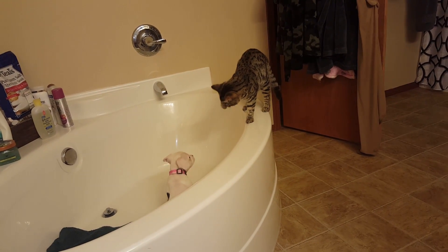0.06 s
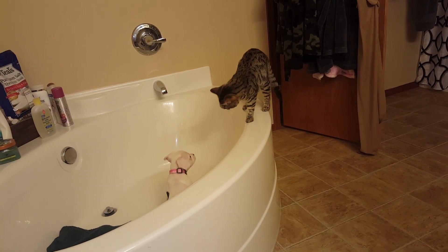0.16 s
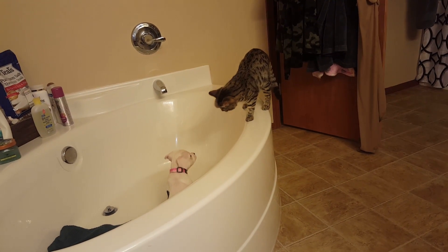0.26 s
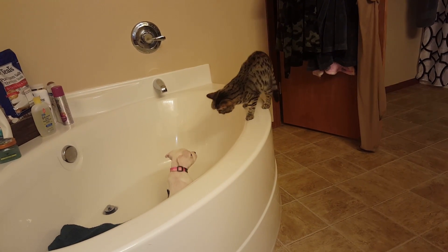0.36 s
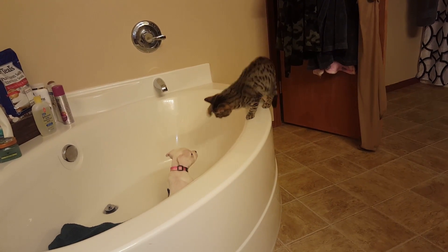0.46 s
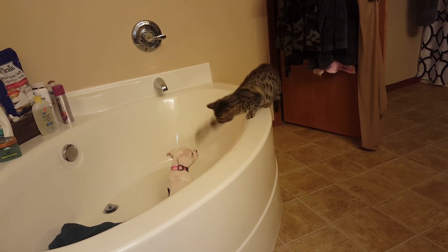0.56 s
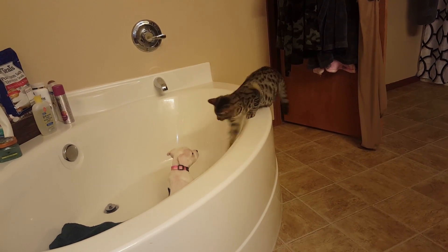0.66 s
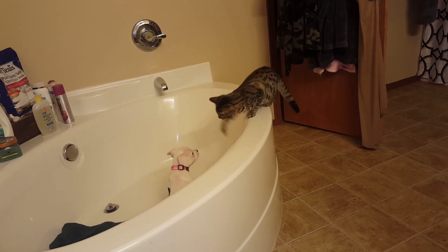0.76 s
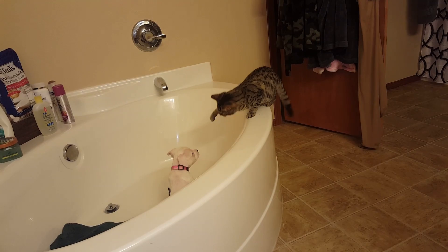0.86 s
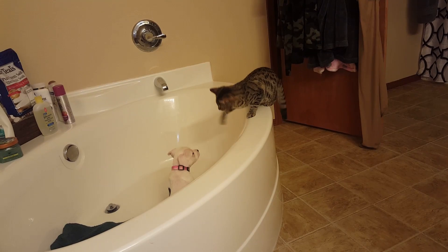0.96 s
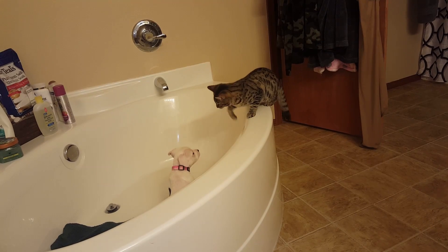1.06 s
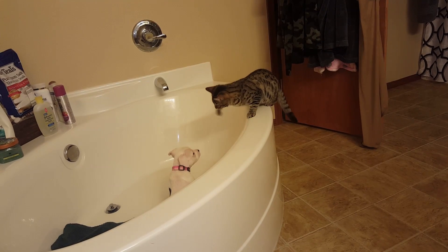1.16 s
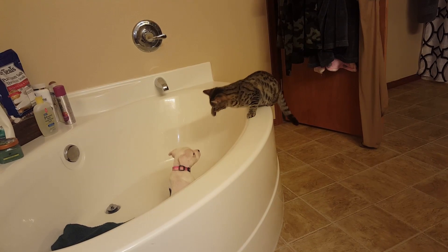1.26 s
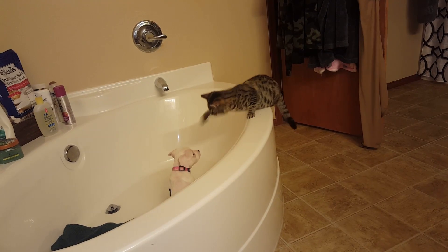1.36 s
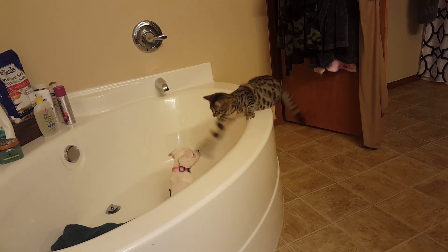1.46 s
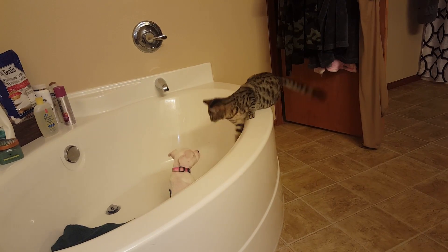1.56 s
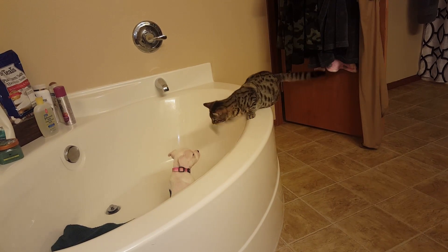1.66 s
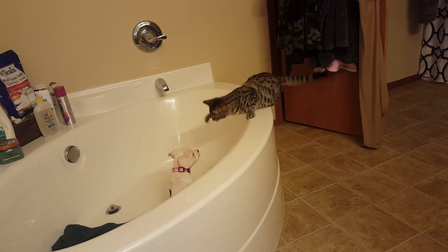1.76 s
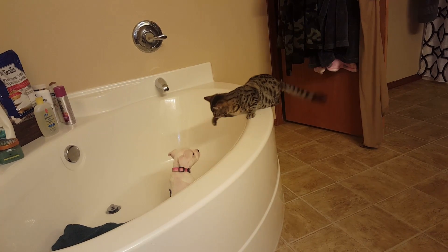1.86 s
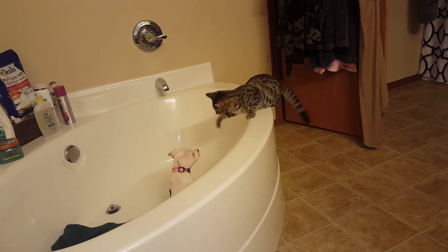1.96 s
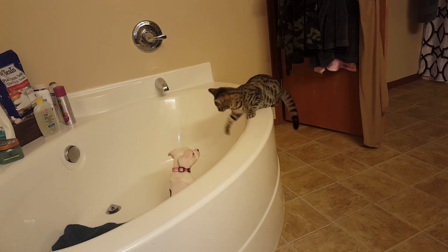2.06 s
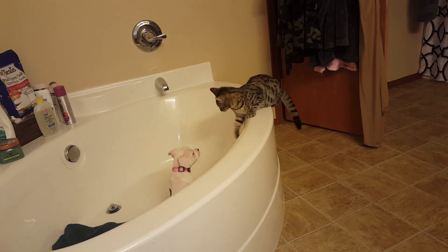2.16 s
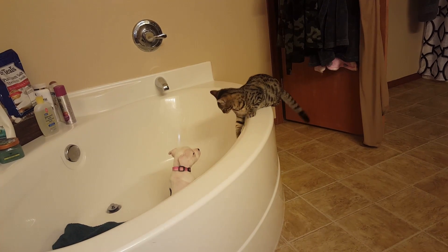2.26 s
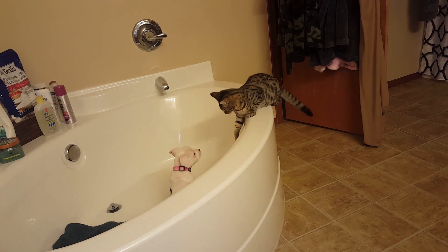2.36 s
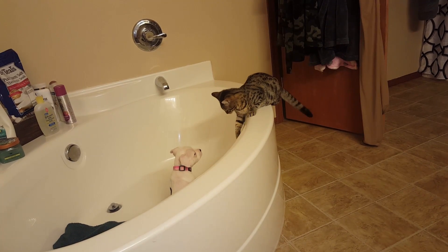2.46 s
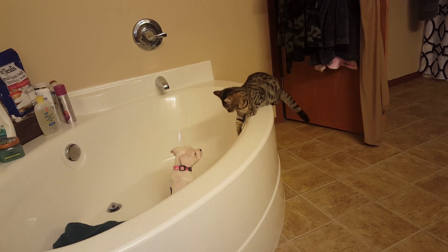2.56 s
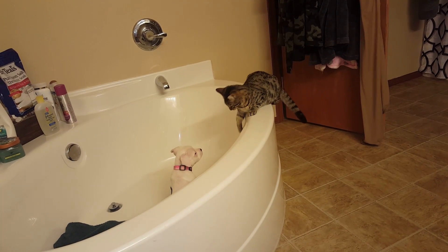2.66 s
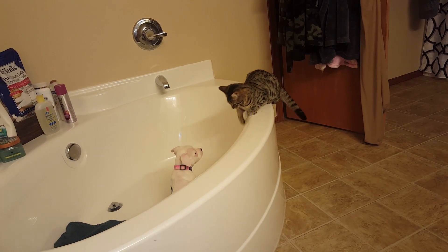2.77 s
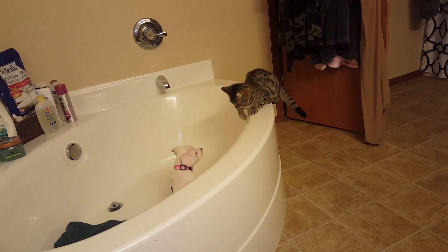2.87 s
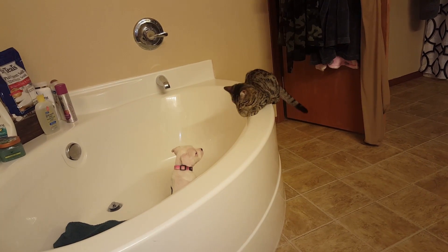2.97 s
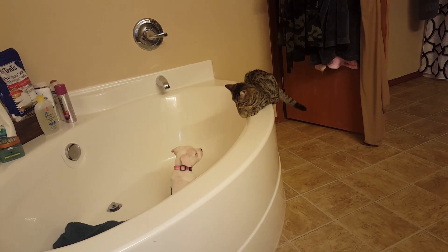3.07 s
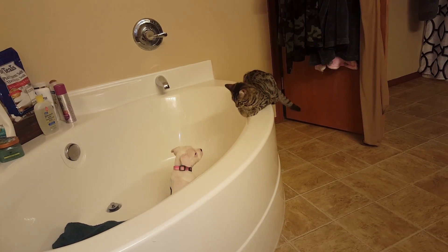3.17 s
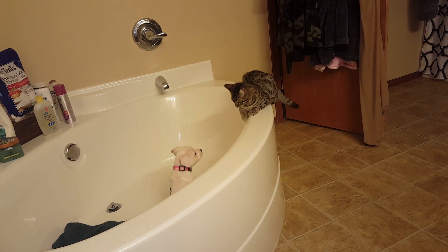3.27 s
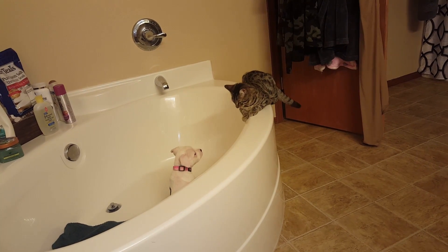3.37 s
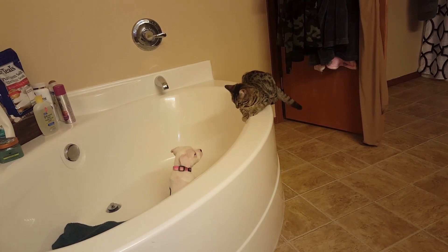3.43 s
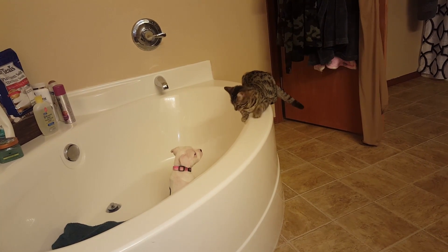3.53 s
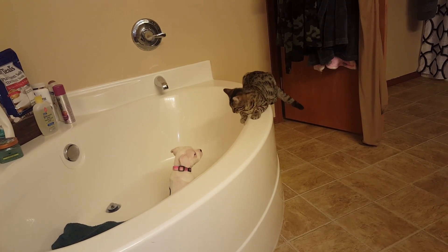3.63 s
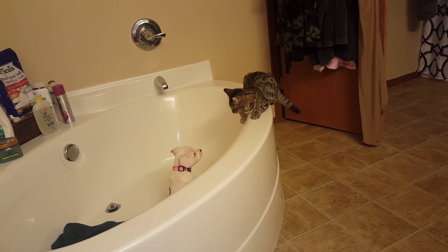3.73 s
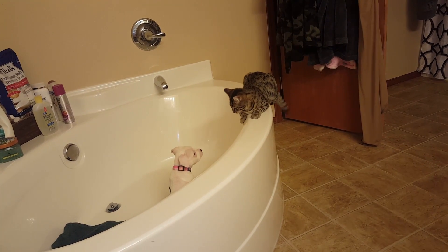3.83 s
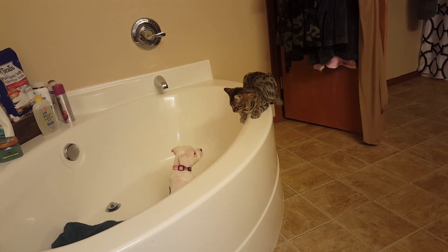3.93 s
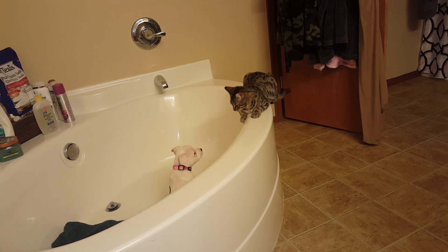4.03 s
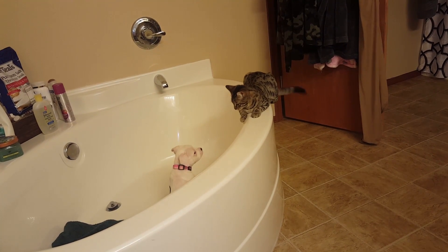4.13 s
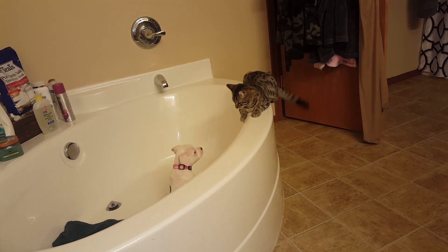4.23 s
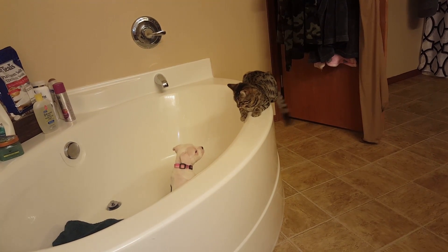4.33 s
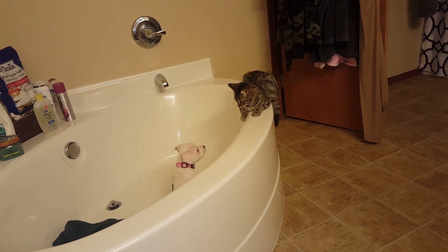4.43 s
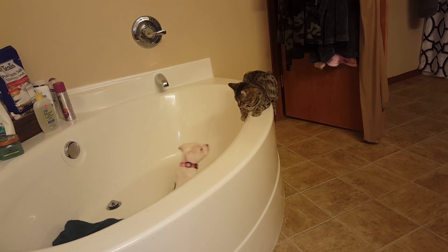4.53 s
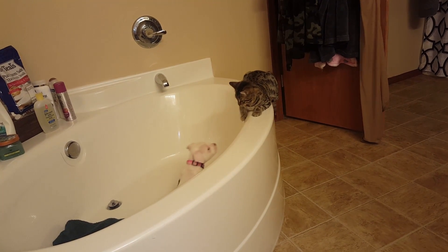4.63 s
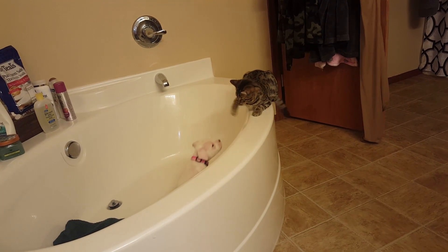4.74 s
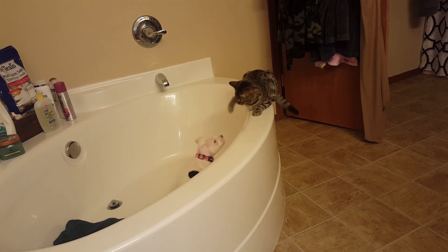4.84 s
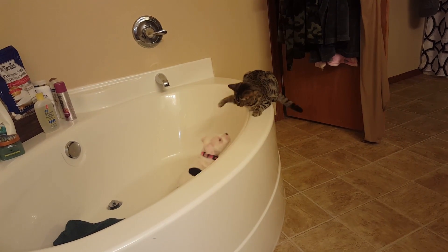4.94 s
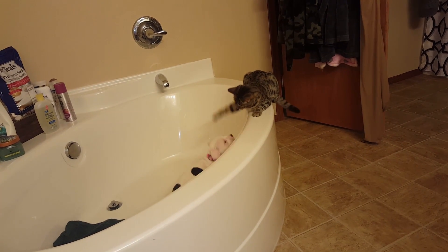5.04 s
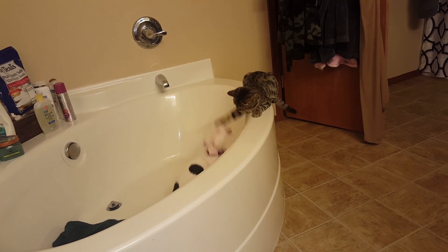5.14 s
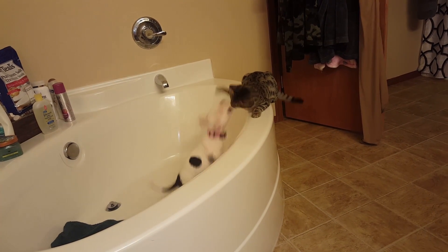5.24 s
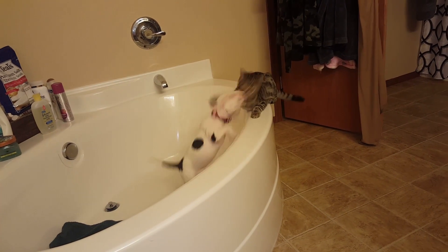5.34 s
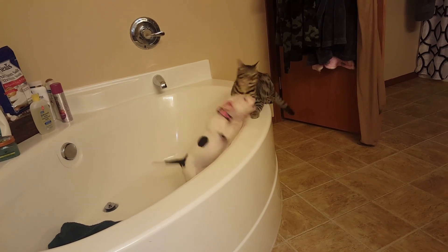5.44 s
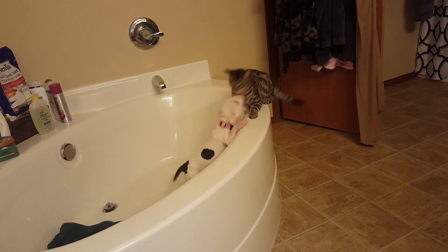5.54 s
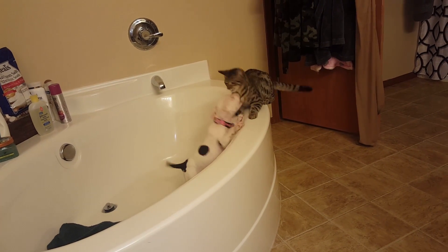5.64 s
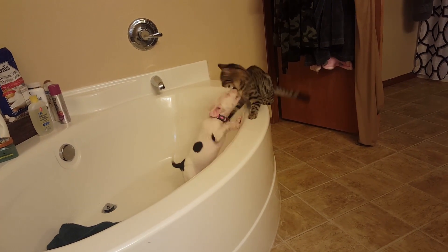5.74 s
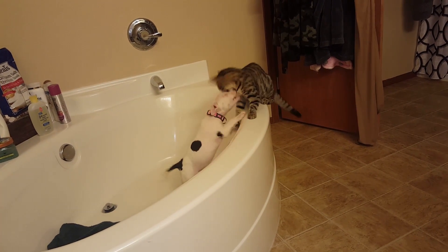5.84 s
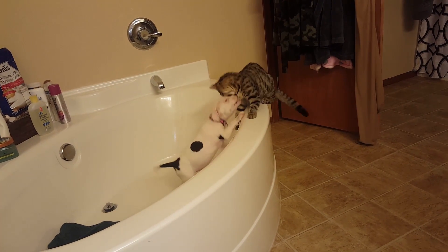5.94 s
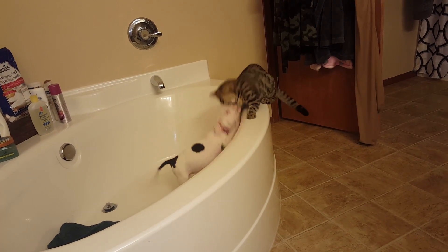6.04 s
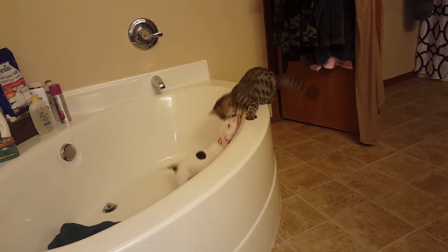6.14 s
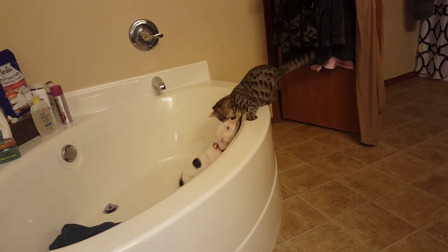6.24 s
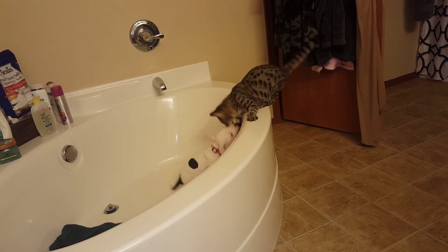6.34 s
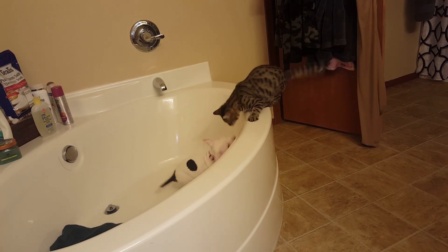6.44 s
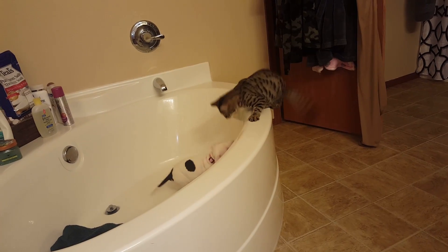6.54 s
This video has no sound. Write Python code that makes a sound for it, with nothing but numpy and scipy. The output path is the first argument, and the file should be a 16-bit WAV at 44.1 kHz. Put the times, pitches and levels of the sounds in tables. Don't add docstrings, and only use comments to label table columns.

```python
import sys
import numpy as np
from scipy import signal
from scipy.fft import rfft, irfft, next_fast_len
from scipy.io import wavfile
from scipy.ndimage import uniform_filter1d

SR = 44100
rng = np.random.default_rng(int(sys.argv[2]) if len(sys.argv) > 2 else 0)


def field_ratio(decibels):
    return 10 ** (np.asarray(decibels, dtype=float) / 20)


def unload_wav(signal):
    wavfile.write(
        sys.argv[1],
        SR,
        np.round(np.clip(np.atleast_2d(signal).T, -1, 1) * 32767).astype(np.int16),
    )


N = 290999


# pitch in Hz, level in dB.
EDGE_COLOUR = [(820, -15), (1400, -6), (1850, -5), (2110, -2.5), (2800, -2.5), (3280, -6), (4760, -7),
               (6000, -14.5), (7800, -30.5), (13200, -120)]
# pitch in Hz, level in dB.
CLAW_COLOUR = [(2940, -15), (5000, -11), (5150, -16), (7170, 1), (7860, 3.5), (8880, 4), (9280, -1),
               (10300, -11), (10900, -30), (11500, -11), (13000, -10), (14200, -10), (16000, -38)]
# start in seconds, edge level in dB, claw level in dB.
HARD_TOUCHES = [(1.616, -63.5, -61), (5.5436, -11, -25.5), (2.7046, -71, -65), (3.255, -55, -61.5),
                (3.624, -67, -75), (3.694, -78, -89), (3.7296, -68, -83), (4.232, -52, -63.5),
                (4.3904, -68, -73), (4.7542, -65, -84), (4.8345, -65.5, -71), (5.079, -64, -50.5),
                (5.0883, -53, -74), (5.421, -46, -43), (5.5214, -46, -56), (5.5463, -11, -18),
                (5.7002, -38, -57), (5.901, -54, -46), (5.987, -47.5, -53), (6.106, -47, -47),
                (6.1432, -45, -44), (6.449, -50, -74), (6.468, -52, -64), (6.5806, -52, -55)]
# start in seconds, weight into the shell in dB, pad level in dB, pad pitch in Hz.
LANDINGS = [(0.5794, -72, -65.5, 633), (1.618, -40.5, -58, 564), (2.064, -41, -37, 520),
            (3.2535, -35, -43, 590), (3.624, -72, -54, 684), (4.2328, -78, -57.5, 1170),
            (4.3906, -82, -59, 1650), (4.8342, -49.5, -64, 468), (5.0803, -39, -59, 530),
            (5.0888, -48, -41, 386), (5.42, -45, -39, 1200), (5.459, -25, -58, 413),
            (5.527, -51, -28.5, 437), (5.551, -25.5, -18.5, 790), (5.7006, -40.5, -40, 443),
            (5.902, -40, -49, 576), (5.9725, -36.5, -44, 460), (5.9852, -64, -38, 1050),
            (6.0241, -68, -53, 1550), (6.106, -32, -40.5, 880), (6.1432, -51, -36.5, 490),
            (6.28, -40, -40.5, 500), (6.4486, -63, -48, 950), (6.5817, -36.5, -51.5, 543)]
# start in seconds, level in dB, direct share in dB.
CATCHES = [(3.623, -58.5, -5), (3.694, -49, -32), (3.733, -53.5, -30), (4.236, -50, -21),
           (4.754, -57.5, -24), (5.089, -39.5, -15), (5.523, -30, -10.5), (5.986, -31, -7),
           (2.068, -45, -28), (5.583, -25.5, -17), (5.084, -46, -17), (5.566, -27.5, -28),
           (5.974, -43.5, -7), (6.024, -40, -14), (6.107, -45, -14), (6.47, -45.5, -14), (2.064, -52, -2),
           (2.072, -44, -2), (2.097, -46, -2), (5.15, -58, -10), (5.182, -58, -15), (6.226, -48, -10),
           (6.275, -46, -10)]
# pitch in Hz, level in dB, 60 dB fade in
# seconds.
CAUGHT_PARTS = [
    [(710, -7, 0.018), (2470, 15, 0.0089)],
    [(1630, -2, 0.017), (2150, 2, 0.011), (2900, -9, 0.05), (3580, -6, 0.018)],
    [(1310, -17, 0.022), (1920, 5, 0.0069), (2970, -9, 0.0082), (3950, -8, 0.019)],
    [(1170, -16, 0.021), (1360, 8, 0.021), (2330, 6, 0.017), (3400, -15, 0.015), (4080, 5, 0.014),
     (4530, 2, 0.031)],
    [(1630, 2, 0.0081), (2600, -11, .01)],
    [(211.3, 18, 0.3), (325, -18, 0.057), (557, -19, 0.091), (700, -19, .04)],
    [(2460, 10, 0.0068), (6700, -8, 0.008)],
    [(1050, -1, 0.1), (1280, 2.5, 0.01), (1460, -8, 0.018)],
    [(1970, 1, 0.0019), (2520, 3, 0.0046), (3420, -13, .006)],
    [(328, -11, 0.055), (463, -7, 0.08), (665, -8, 0.014), (970, -6, 0.03)],
    [(9300, 0, 0.0022), (12200, -7, .002)],
    [(1010, 0, 0.024)],
    [(490, 0, 0.02)],
    [(1550, 0, 0.028)],
    [(2600, 0, 0.013), (3430, 0, 0.0092)],
    [(2370, 3, 0.0056), (3000, -10, 0.0091)],
    [(420, 0, .03), (900, -6, .02)],
    [(420, 0, .12), (770, -6, .1), (1390, -7, .1)],
    [(500, 0, .08), (880, -2, .08)],
    [(4600, 0, .2)],
    [(6500, 0, .01), (12500, -4, .006)],
    [(700, 0, .02), (2900, -8, .01)],
    [(500, 0, .03), (1000, -3, .02)],
]


def contacts(send_db=24, weight_send_db=22, rebound=0.2, settle_ms=30, pad_octaves=0.84):
    places, near = np.zeros((4, N)), np.zeros(N)
    edge, claw, body = colour(EDGE_COLOUR, steep_db=26), colour(CLAW_COLOUR), shell()
    clicks = [(s, field_ratio(edge_db) * edge + field_ratio(claw_db) * claw) for s, edge_db, claw_db in HARD_TOUCHES]
    for k, (s, weight_db, pad_db, pad_hz) in enumerate(LANDINGS):
        low_hz, high_hz = pad_hz / 2 ** pad_octaves, pad_hz * 2 ** pad_octaves
        pad = colour([(low_hz, -5), (pad_hz, 0), (high_hz, -7)], steep_db=25)
        clicks.append((s, field_ratio(pad_db) * pad))
        add(places[k % 4], s, field_ratio(weight_send_db + weight_db) * body)

    delays = rng.uniform(0.14, 1, (len(clicks), 2)) * settle_ms / 1000
    for k, (s, click) in enumerate(clicks):
        sent = field_ratio(send_db) * click
        add(places[k % 4], s, sent)
        add(places[(k + 1) % 4], s + delays[k, 0], rebound * sent)
        add(places[(k + 2) % 4], s + delays[k, 1], rebound * sent)

    for k, ((s, db, near_db), modes) in enumerate(zip(CATCHES, CAUGHT_PARTS)):
        ring = catch(modes)
        add(places[k % 4], s, field_ratio(send_db - 2 + db) * ring)
        add(near, s, field_ratio(send_db + near_db + db) * ring)
    heard = near + sum(room(place) for place in places)
    return signal.lfilter(*signal.butter(2, 50, "high", fs=SR), heard)


def catch(modes):
    hz, db, t60 = np.transpose(modes)[:, :, None]
    t = np.arange(9000) / SR
    ring = field_ratio(db - 60 * t / t60) / np.sqrt(t60) * np.sin(2 * np.pi * hz * t)
    ring = ring.sum(axis=0) * (1 - np.exp(-t / 0.0004))
    return ring / np.linalg.norm(ring)


# pitch in Hz, width in Hz, level in dB.
SHELL_MODES = [(42, 18, -16), (63, 18, -7), (91, 18, 2), (125, 24, -10), (160, 18, 2), (225, 22, 3),
               (280, 30, -5), (345, 30, -14), (465, 24, -5)]


def shell():
    t = np.arange(8000) / SR
    ring = np.zeros(len(t))
    for hz, width, db in SHELL_MODES:
        ring += field_ratio(db) * width * np.exp(-np.pi * width * t) * np.sin(2 * np.pi * hz * t)
    ring = signal.lfilter(*signal.butter(2, 38, "high", fs=SR), ring)
    return ring / np.linalg.norm(ring)


# start in seconds, level in dB, pitch in Hz, 60 dB fade in seconds.
BOOMS = [(3.631, -59, 38, .4), (5.458, -38, 89.6, 0.41), (5.457, -26, 220, 0.071), (5.45, -38, 40, .5),
         (5.53, -39, 40, .5), (5.534, -24, 63, 0.16), (5.543, -26.5, 90.6, 0.39), (5.565, -28.5, 464, 0.37),
         (5.684, -33.5, 162.3, 0.33), (5.904, -46, 221, 0.11), (5.9, -43, 40, 0.27), (5.9, -59, 65, 0.25),
         (6.07, -39, 94.6, 0.47), (6.106, -30.5, 157, 0.097), (5.549, -33.5, 220, 0.35),
         (6.168, -29, 233, 0.33), (6.305, -38, 132, 0.17), (5.09, -38, 251, 0.19), (6.15, -52, 40, .3),
         (6.235, -62, 63, .35), (6.255, -35.5, 89.5, 0.75), (6.362, -33, 208.4, 0.25),
         (6.275, -33, 118, .2), (6.31, -36, 95, .2), (6.43, -33.5, 162.3, 0.19)]


def booms(rise_ms=9.8):
    out, t = np.zeros(N), np.arange(SR // 2) / SR
    for s, db, hz, t60 in BOOMS:
        swell = 1 - np.exp(-t * 1000 / rise_ms)
        add(out, s, field_ratio(db - 60 * t / t60) * swell * np.sin(2 * np.pi * hz * t))
    return out


# pitch in Hz, level in dB.
FUR_COLOUR = [(1470, -12.5), (2500, -9), (3130, -9.5), (3600, -9.5), (4620, -9), (5800, -9), (8460, -6.5),
              (10400, -16), (13000, -10.5), (15000, -21), (16000, -11)]
# pitch in Hz, level in dB.
DRAG_COLOUR = [(210, -34), (330, -2.5), (420, -11.5), (661, -10.5), (1080, -13), (1270, -16.5),
               (3500, -35.5), (4550, -76), (7700, -120)]
# start in seconds, rise in seconds, fade in seconds, hiss in dB, sheen in dB over the hiss.
BRUSHES = [(.96, 0.067, 0.23, -59, -3), (1.07, 0.075, 0.13, -57.5, -14), (2.70, 0.023, 0.11, -52, -3),
           (4.28, .03, .14, -67, -3), (4.6, 0.06, 0.091, -58.5, -14), (4.86, 0.03, 0.054, -69, 3.5),
           (5.066, 0.01, 0.13, -47.5, -9), (5.13, 0.047, 0.041, -40, -5), (5.26, 0.1, 0.08, -54, -4),
           (5.41, 0.0064, 0.082, -37.5, -1), (5.77, 0.051, 0.22, -47.5, -0.5),
           (5.88, 0.057, 0.045, -44, -5), (6.07, 0.028, 0.28, -50, 3.5), (6.22, 0.14, 0.17, -49.5, -2.5),
           (6.42, 0.052, 0.13, -53, -3.5), (6.55, .05, .05, -52.5, 1)]
# start in seconds, rise in seconds, fade in seconds, skin drag in dB, shell rumble in dB.
SLIDES = [(2.72, 0.026, 0.057, -56, -70), (5.067, 0.027, 0.082, -41.5, -45), (5.11, 0.032, 0.06, -50, -56),
          (5.42, 0.026, 0.04, -34.5, -51), (5.48, 0.056, 0.037, -34, -37), (5.83, 0.037, 0.042, -45, -57),
          (5.889, 0.018, 0.069, -46.5, -37.5), (5.95, 0.012, 0.033, -45, -66),
          (6.07, 0.071, 0.16, -41.5, -38.5), (6.14, 0.055, 0.14, -45.5, -37),
          (6.22, 0.097, 0.15, -41.5, -38), (6.38, 0.057, 0.059, -54, -46), (6.55, 0.055, 0.065, -42.5, -45)]


def strokes(slips_per_s=900, uneven_db=3.5, fur_db=-3, drag_db=-4, rumble_db=-3, wet_db=-6):
    slipping = rng.random((3, N)) < slips_per_s / SR
    jerk = field_ratio(uneven_db * np.minimum(rng.exponential(1, (3, N)), 3))
    slips = rng.standard_normal((3, N)) * (1.06 + slipping * jerk)

    def rubbed(slip, body, db):
        return field_ratio(db) * evened(signal.fftconvolve(slip, body)[:N])

    hiss = rubbed(slips[0], colour(FUR_COLOUR), fur_db)
    drag = rubbed(slips[1], colour(DRAG_COLOUR), drag_db)
    rumble = rubbed(slips[2], shell(), rumble_db)

    fur, sheen, skin, shake = np.zeros((4, N))
    for start, rise, fade, db, sheen_db in BRUSHES:
        pressure = stroke(start, rise, fade)
        fur += field_ratio(db) * pressure
        sheen += field_ratio(db + sheen_db) * pressure
    for start, rise, fade, skin_db, shake_db in SLIDES:
        pressure = stroke(start, rise, fade)
        skin += field_ratio(skin_db) * pressure
        shake += field_ratio(shake_db) * pressure

    dull = signal.lfilter(*signal.butter(2, 5060, fs=SR), hiss)
    dry = fur * dull + sheen * (hiss - dull) + skin * drag + shake * rumble
    return room(field_ratio(wet_db) * dry, direct_db=-4)


def stroke(start, rise, fade, swell_power=1.25, fade_db=-21, fade_power=2.32):
    t = np.arange(0, N, 16) / SR - start
    gone = np.maximum(t - rise, 0) / max(fade, 0.005)
    swell = np.clip(t / max(rise, 0.002), 0, 1) ** swell_power
    pressure = swell * field_ratio(fade_db * np.minimum(gone, 3) ** fade_power)
    return np.repeat(pressure, 16)[:N]


# start in seconds, rise in seconds, fade in seconds, level in dB,
# middle pitch in Hz.
SCUFFS = [(1.615, .025, 0.14, -56.5, 348), (2.065, 0.0092, 0.14, -49, 1120), (2.07, 0.022, 0.32, -59, 520),
          (3.25, 0.0092, .1, -60.5, 1550), (3.69, 0.033, 0.058, -65, 1900),
          (4.231, 0.0087, 0.056, -56.5, 2200), (5.416, 0.0087, 0.044, -43.5, 1300),
          (5.57, 0.015, 0.053, -28.5, 550), (5.984, 0.005, 0.06, -37.5, 1300),
          (6.26, 0.032, .12, -47.5, 700), (6.578, .005, 0.027, -45, 2300), (5.543, 0.017, 0.058, -26, 3600),
          (5.545, 0.0071, 0.044, -25.5, 2300), (5.44, .02, .03, -51, 6400),
          (2.066, 0.008, 0.025, -59, 3500), (2.07, .03, .12, -56, 900), (3.688, .02, .07, -62, 3300),
          (3.63, .02, .05, -67, 700), (6.03, .03, .04, -48, 1350), (6.105, .015, .05, -47, 920),
          (6.17, .03, .04, -47, 600), (6.32, .02, .04, -55, 1800), (6.43, .04, .06, -52, 1000),
          (5.1, .07, .07, -58, 4600), (5.56, .02, .1, -34, 950), (5.072, .006, .04, -58, 8500),
          (3.84, .06, .14, -74, 8000), (5.546, .012, .07, -31, 5300), (5.44, .025, .05, -56, 12500),
          (6.135, .015, .06, -50, 2600), (4.232, .01, .07, -63, 1200), (4.25, .03, .1, -65, 4200),
          (5.416, .006, .02, -56, 13500)]


def scuffs(octaves=0.6, wet_db=-6):
    length = SR // 2
    out, chatter = np.zeros(N), rng.standard_normal(length)
    for start, rise, fade, db, hz in SCUFFS:
        tone = colour([(hz / 2 ** octaves, -5), (hz, 0), (hz * 2 ** octaves, -6)], steep_db=27.5)
        rub = signal.fftconvolve(np.roll(chatter, round(hz)), tone)[:length]
        add(out, start, field_ratio(db) * stroke(0, rise, fade)[:length] * rub)
    return room(field_ratio(wet_db) * out, direct_db=-2)


# start in seconds, level in dB, rise in milliseconds.
KNOCKS = [
    (1.614, -38, 17),
    (2.064, -27.5, 1.2),
    (3.25, -32.5, 8.7),
]
# pitch in Hz, level in dB, 60 dB fade in seconds.
PANELS = [
    [(89.3, -16.5, 1), (166, 1.5, 0.64), (211, 2, 0.35), (235, -2, 0.37), (270, -0.5, 0.44),
     (325.4, -7.5, 0.57), (429, -12, 0.38)],
    [(130.2, -10.5, 0.52), (235, -9, 0.4), (267, -8.5, 0.52), (401, 7.5, 0.28), (435, -4, 0.36),
     (508, 2, 0.3), (577, -7, 0.3), (660, -1.5, 0.18), (803, -3.5, 0.3), (894, -4, 0.26), (964, -6, 0.39),
     (1057, -13, 0.39), (1385, -2.5, 0.26), (1500, -9, 0.3)],
    [(90.2, 4.5, 0.31), (127, 0, 0.25), (210, 1, 0.35), (233.3, -3.5, 0.4), (340, -7, 0.19),
     (516, -5.5, 0.16), (723, -19, 0.42), (784, -3, 0.1), (1000, -19, 0.36), (1200, -26, 0.3)],
]


def knocks(spread=0.00055, scatter=0.85):
    out, t = np.zeros((2, N)), np.arange(SR) / SR
    for (s, level_db, rise_ms), modes in zip(KNOCKS, PANELS):
        hz, db, t60 = np.transpose(modes)[:, :, None]
        start, apart, split = rng.uniform(-0.76, 1, (3, len(modes), 1))
        side = np.array([1, -1])[:, None, None]
        phase = start + side * spread * hz * apart
        first = np.sin(2 * np.pi * hz * t + phase)
        twin = np.sin(2 * np.pi * hz * (1 + 0.0443 * split) * t - phase)
        pair = first + scatter * np.minimum(hz / 500, 1) * twin
        ring = (field_ratio(db - 60 * t / t60) * pair).sum(axis=1)
        ring = ring / np.sqrt(np.mean(ring[:, :800] ** 2))
        ring = ring * (1 - np.exp(-t * 1000 / max(rise_ms, 0.5)))
        add(out, s, field_ratio(level_db - 4.5) * ring)
    return signal.lfilter(*signal.butter(3, 62, "high", fs=SR), out)


# start in seconds, rise in seconds, fade in seconds, level in dB, first pitch in Hz.
CREEPS = [
    (0, 0.021, 0.18, -75, 510),
    (3.86, 0.05, 0.08, -77, 480),
    (3.95, 0.12, 0.2, -73, 530),
    (4.18, 0.08, 0.2, -72, 540),
]


def creeps(sag_hz_per_s=120, width_hz=110):
    out, r = np.zeros(N), np.exp(-np.pi * width_hz / SR)
    for start, rise, fade, db, hz in CREEPS:
        pitch = hz - sag_hz_per_s * np.clip(np.arange(N) / SR - start, 0, 1)
        noise = rng.standard_normal(N) + 1j * rng.standard_normal(N)
        fuzz = signal.lfilter([1], [1, -2 * r, r * r], noise)
        note = (fuzz * np.exp(2j * np.pi * np.cumsum(pitch) / SR)).real
        out += field_ratio(db) * stroke(start, rise, fade) * evened(note)
    return room(out, direct_db=0.5)


# middle in seconds, pitch in Hz, level in dB, length in seconds.
FINGER_BUMP = (.314, 150, -52, .007)


def bump():
    s, hz, db, length = FINGER_BUMP
    t = np.arange(N) / SR - s
    return field_ratio(db) * np.exp(-(t / length) ** 2) * np.sin(2 * np.pi * hz * t)


# pitch in Hz, level in dB.
HUSH_COLOUR = [(15, -33), (25, 0), (35, -2), (49, -17), (92, -7), (344, -13.5), (394, -14), (936, -19.5),
               (1130, -20), (2550, -23.5), (4490, -28.5), (8590, -31.5), (10100, -36), (14800, -30.5),
               (16000, -36)]
# pitch in Hz, likeness from 0 to 1.
HUSH_LIKENESS = [(30, 1), (150, 0.42), (500, 0.3), (1500, 0.021), (15000, 0.03)]
# time in seconds, level in dB.
STIRRING = [(0, -0.5), (.9, 3), (1.5, 3), (2.2, 3.5), (2.7, 4.5), (3.1, 4), (3.9, 4.5), (4.15, 3), (4.6, 5),
            (5.3, 12), (6.6, -1)]


def hush(level_db=-67, patchy_db=0.6):
    hz, t = np.fft.rfftfreq(2048, 1 / SR), np.arange(N // 512 + 6) * 512 / SR
    patches = rng.standard_normal((len(t), len(hz)))
    patches = uniform_filter1d(uniform_filter1d(patches, 8, 0), 30, 1)
    patches = evened(patches).T
    swell_share = read([(300, 0.33), (2200, 0.71), (7000, 0.43)], hz)[:, None]
    swell = swell_share * np.interp(t, *np.transpose(STIRRING))
    lumpy_db = patchy_db + read([(30, 0.46), (90, 0.087)], hz)[:, None]
    field = field_ratio(read(HUSH_COLOUR, hz)[:, None] + lumpy_db * patches + swell)
    tone = port_pair(field, read(HUSH_LIKENESS, hz), 0 * hz, size=2048)[:, :N]
    return field_ratio(level_db) * evened(tone)


# pitch in Hz, 60 dB fade in seconds.
ROOM_FADE = [(100, 0.48), (260, 0.39), (700, 0.38), (1840, 0.4), (4850, 0.37), (12800, 0.28)]
# pitch in Hz, likeness from 0 to 1.
ROOM_LIKENESS = [(40, 1), (150, 0.93), (350, 0.95), (700, 0.56), (1000, 0.28), (1400, 1), (2300, 0.062),
                 (6000, 0.14), (15000, 0.33)]
# pitch in Hz, lead in radians.
LEFT_LEAD = [(40, .02), (400, 0.21), (700, 0.6), (1000, 1.1), (1500, 2.13), (16000, 4)]


def room(x, direct_db=-13, build_ms=0.36):
    hz, t = np.fft.rfftfreq(512, 1 / SR), np.arange(240) * 128 / SR
    fade = field_ratio(-60 * t / read(ROOM_FADE, hz)[:, None])
    tail = port_pair(fade, read(ROOM_LIKENESS, hz), read(LEFT_LEAD, hz), size=512)
    tail = tail * (1 - np.exp(-np.arange(tail.shape[1]) / SR * 1000 / build_ms))
    tail = tail / np.linalg.norm(tail, axis=1, keepdims=True)
    add(tail, 0, field_ratio(direct_db) * np.ones((2, 1)))
    return signal.fftconvolve(x[None], tail, axes=1)[:, :N]


def port_pair(magnitude, same, lead, size):
    a, b, c, d = rng.standard_normal(magnitude.T.shape + (4,)).T
    same, left = np.clip(same, -1, 1)[:, None], a + 1j * b
    right = same * left + np.sqrt(1 - same ** 2) * (c + 1j * d)
    right = right * np.exp(-1j * lead)[:, None]
    return signal.istft(np.array([left, right]) * magnitude, nperseg=size, noverlap=size * 3 // 4)[1]


def colour(points, steep_db=30):
    hz = abs(np.fft.fftfreq(4096, 1 / SR)) + 1
    below = np.maximum(np.log2(points[0][0] / hz), 0)
    above = np.maximum(np.log2(hz / points[-1][0]), 0)
    gain_db = read(points, hz) - steep_db * (below + above)
    log_gain = np.log(field_ratio(np.maximum(gain_db, -100)))
    taps = np.fft.ifft(np.exp(np.conj(signal.hilbert(log_gain)))).real[:2048]
    return taps / np.linalg.norm(taps)


def evened(x):
    return x / np.sqrt(np.mean(x ** 2) + 1e-30)


def read(points, hz):
    f, value = np.transpose(points)
    return np.interp(np.log(hz + 1), np.log(f + 1), value)


def add(mix, s, sound):
    part = mix[..., round(s * SR):][..., :sound.shape[-1]]
    part += sound[..., :part.shape[-1]]


def scene():
    panels = knocks()
    rest = contacts() + strokes() + bump() + hush() + creeps() + booms()
    to_room = signal.lfilter(*signal.butter(2, 380, "high", fs=SR), panels.mean(axis=0))
    return panels + rest + field_ratio(-6.5) * room(to_room, direct_db=-45) + scuffs()


def roll_off(x):
    return signal.sosfilt(signal.butter(12, 15780, fs=SR, output="sos"), x)


# pitch in Hz, level difference in dB.
PORT_BALANCE = [(40, 2.5), (700, 0), (1400, -0.5), (3000, -1.4), (9000, -1.5), (14000, -0.5)]


def record(dry):
    size = next_fast_len(N)
    hz = np.fft.rfftfreq(size, 1 / SR)
    balance = field_ratio(np.array([[0.5], [-0.5]]) * read(PORT_BALANCE, hz))
    low_cut = 1 / np.sqrt(1 + (34 / (hz + 1)) ** 6)
    band_edge = field_ratio(-60 * np.clip((hz - 15950) / 500, 0, 1))
    heard = irfft(rfft(dry, size) * balance * low_cut * band_edge, size)[:, :N]
    mix = heard - 0.00042
    return roll_off(mix)


dry = scene()
out = record(dry)
unload_wav(out)
```